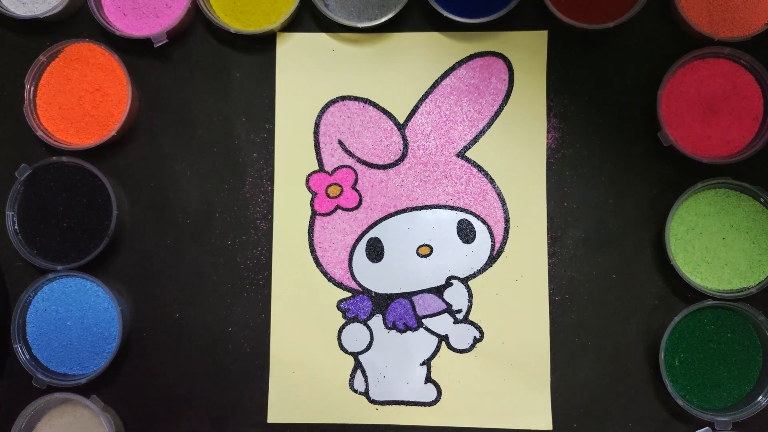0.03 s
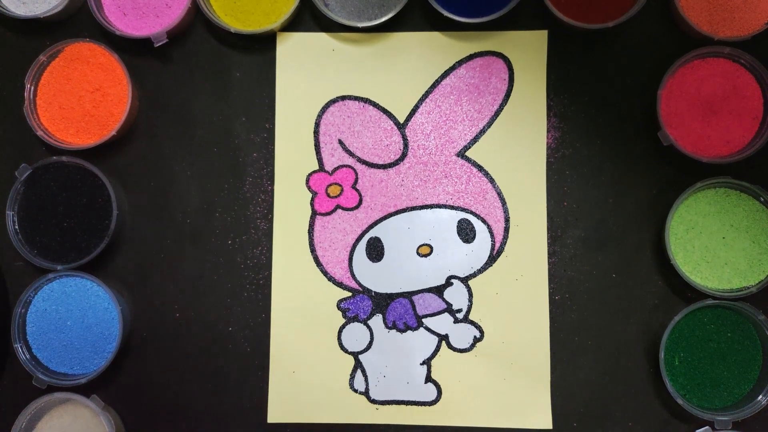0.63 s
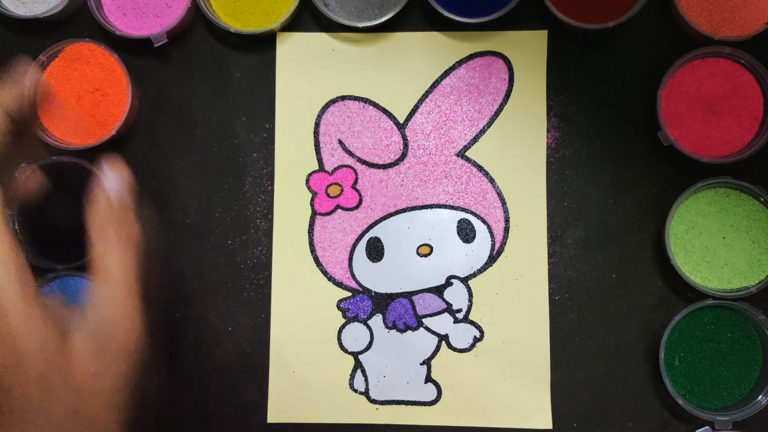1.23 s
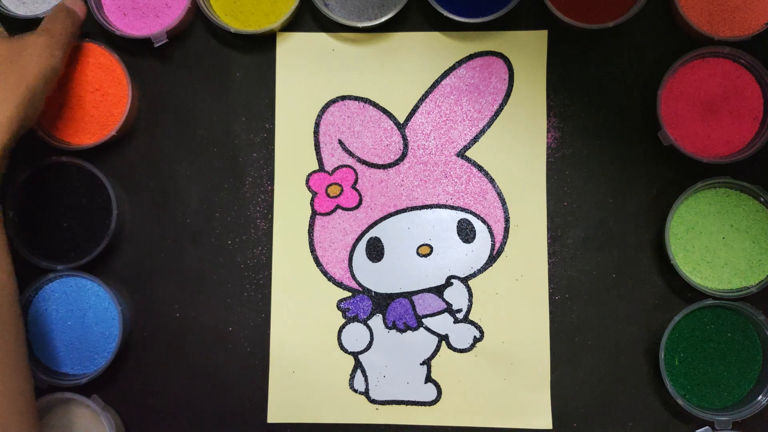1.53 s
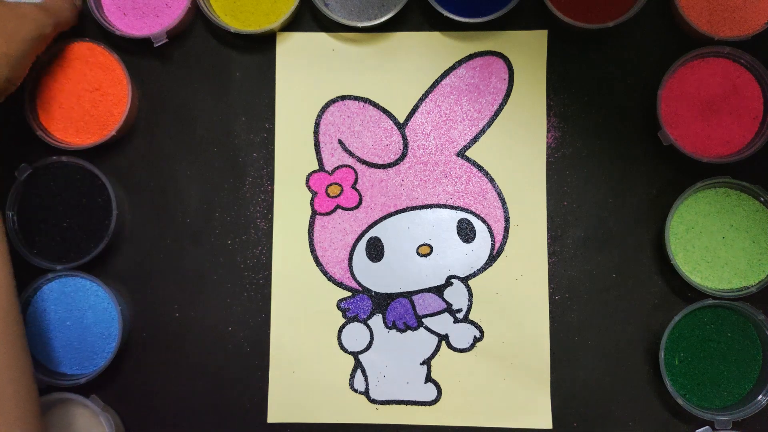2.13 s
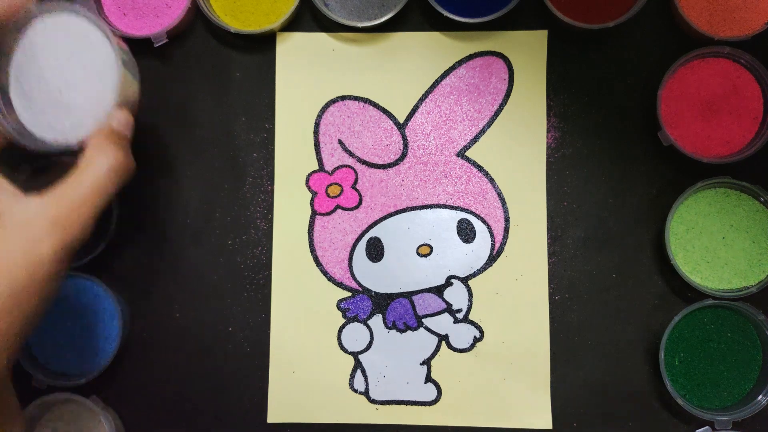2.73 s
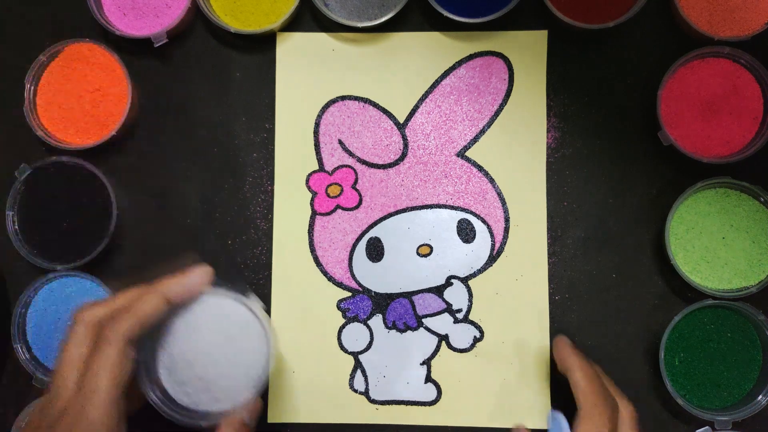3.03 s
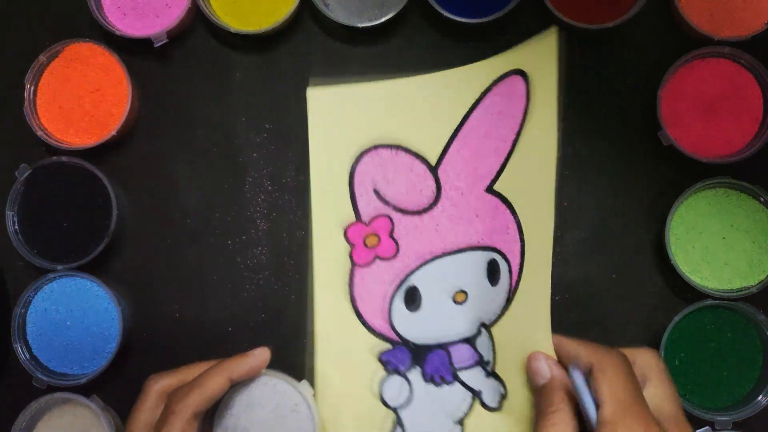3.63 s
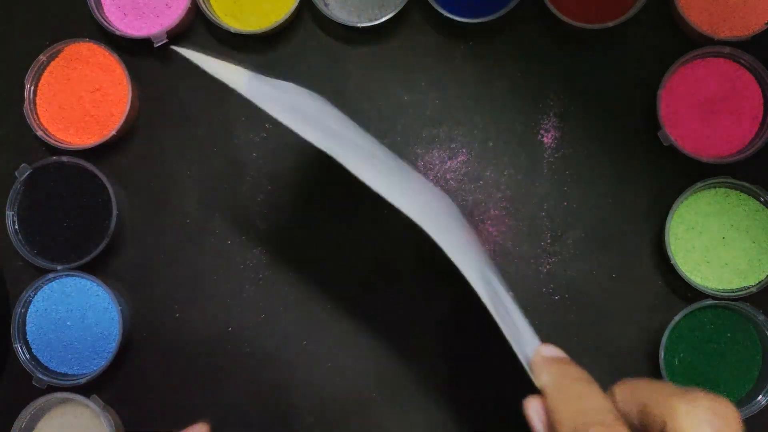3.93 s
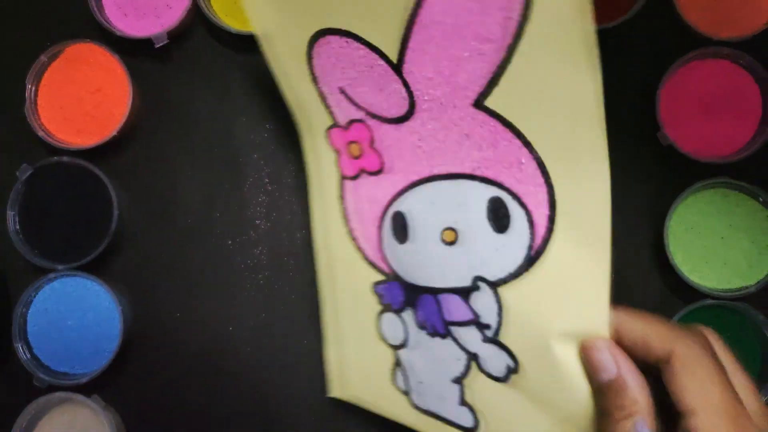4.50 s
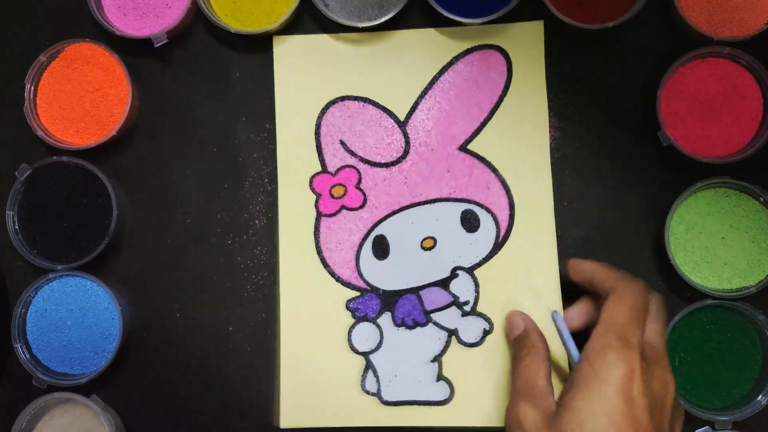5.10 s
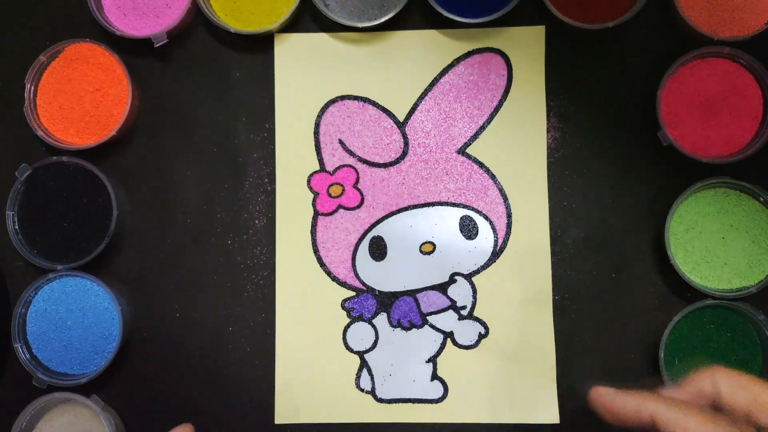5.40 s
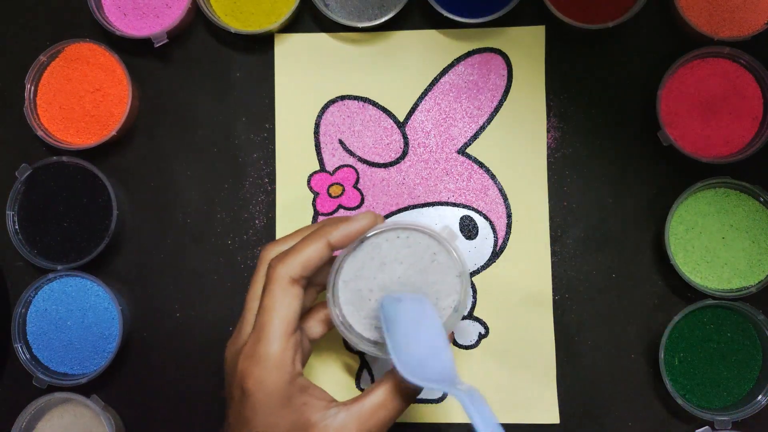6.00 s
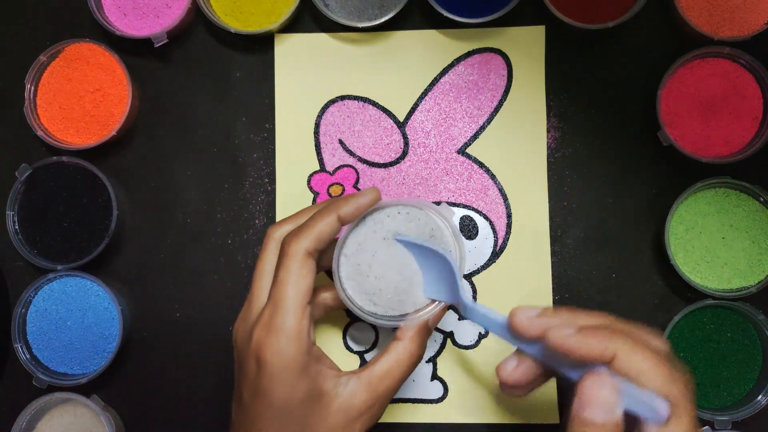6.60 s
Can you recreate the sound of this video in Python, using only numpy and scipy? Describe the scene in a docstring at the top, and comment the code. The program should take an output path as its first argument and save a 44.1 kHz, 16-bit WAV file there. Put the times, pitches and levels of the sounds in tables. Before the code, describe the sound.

A quiet, dry room with a low rumble and faint hiss is heard from close by. A small plastic click and a soft brush of sand come in the first half second, then very little until about 3 seconds. From 3.3 to 3.8 seconds a sand-coated card is dragged off a gritty table in rustling, catching scrapes, with a plastic click and dull buckling pops. It is shaken twice, at about 4.1 and 4.3 seconds, flapping and crinkling while loose grains tick down and a little sand swishes across it. Near 4.8 seconds the card buckles and lands with a short hollow knock and a puff of air, the loudest moment. It slides back into place over crackling grit until 5.3 seconds. After a pause and a tiny click, a plastic spoon digs softly into a pot of sand at around 6.6 seconds.

```python
"""A quiet, dry room with a low rumble, heard from close by. A sand-coated card is dragged off a gritty
table, shaken twice so that it buckles and sheds grains, dropped and slid back into place; then a
plastic spoon digs into a pot of sand. Sliding, scraping and digging are dense tiny grain impacts,
buckles are bending waves, and the face of the card pushes puffs of air. Table and plastic ring briefly."""
import sys
import numpy as np
from scipy import signal
from scipy.fft import rfft, irfft
from scipy.io import wavfile

SR = 44100
rng = np.random.default_rng(int(sys.argv[2]) if len(sys.argv) > 2 else 0)


def to_wav(s):
    """Save 16-bit WAV."""
    ch = np.atleast_2d(s).T  # columns
    pcm = np.round(np.clip(ch, -1, 1) * 32767)  # PCM
    wavfile.write(sys.argv[1], SR, pcm.astype(np.int16))


N = 297675
TIME = np.arange(N) / SR
FREQ = np.maximum(np.arange(N // 2 + 1) * SR / N, .1)
BODY_HZ, HISS_HZ = 1660, 8340  # crossovers: body | rasp | hiss


def undb(db):
    """Decibels to gain."""
    return 10 ** (np.asarray(db) / 20)


def unit_rms(x):
    """Scale to rms 1."""
    return x / np.sqrt(np.mean(x ** 2))


def colour_gain(colour, f):
    """Gain of a (f/Hz, level/dB) curve at f."""
    hz, db = np.transpose(colour)
    return undb(np.interp(np.log(f), np.log(hz), db))


def lowpass(f, hz, order=4):
    """Smooth low-pass gain."""
    return 1 / np.sqrt(1 + (f / hz) ** (2 * order))


def highpass(f, hz, order=4):
    """Smooth high-pass gain."""
    return lowpass(hz, f, order)


def shaped(x, gain):
    """Filter by a gain per frequency; rms 1."""
    return unit_rms(irfft(rfft(x) * gain, N))


def noise(gain):
    """Filtered Gaussian noise; rms 1."""
    return shaped(rng.standard_normal(N), gain)


def wander(rate_hz):
    """Random wander; rms 1."""
    return noise(lowpass(FREQ, rate_hz, order=2))


def minimum_phase(gain):
    """Spectrum of the most compact causal response with these gains."""
    cepstrum = irfft(np.log(gain))
    half = len(cepstrum) // 2
    return np.exp(rfft(np.r_[cepstrum[0], 2 * cepstrum[1:half], np.zeros(half)]))


def add(out, start_s, x):
    """Mix x into out."""
    i = max(int(start_s * SR), 0)
    out[i:i + len(x)] += x[:max(N - i, 0)]


def held(start_s, end_s, attack_s, release_s):
    """Envelope: linear rise, hold, exponential decay."""
    rise = np.clip((TIME - start_s) / attack_s + .5, 0, 1)
    return rise * np.exp(-np.clip((TIME - end_s) / release_s, 0, 20))


def swells(rows):
    """Envelope of Gaussian swells, summed in power."""
    return np.sqrt(sum(undb(2 * db) * np.exp(-((TIME - s) / half_s) ** 2) for s, half_s, db in rows))


def grains(per_s, spread_db):
    """Dense tiny impacts of uneven size."""
    size = undb(spread_db * np.minimum(rng.exponential(size=N), 4))
    return (rng.random(N) < per_s / SR) * size * rng.standard_normal(N)


# room noise spectrum: f/Hz, level/dB
ROOM_COLOUR = [(12, -44), (20, -2), (30, -9.5), (38, -12.5), (74, -16.5), (248, -27), (277, -27),
               (738, -32.5), (923, -34.5), (1370, -36.5), (2990, -40), (12800, -45), (16000, -46.5)]

def room_tone(hiss_db=-50.5, drift_db=-43):
    """Steady hiss and rumble over slow pressure drift."""
    hiss = noise(colour_gain(ROOM_COLOUR, FREQ) * highpass(FREQ, 15.5))
    drift = noise(lowpass(FREQ, 12, order=2) * highpass(FREQ, 2.06))
    return undb(hiss_db) * hiss + undb(drift_db) * drift


def reflections(x, t60_s=0.081, gap_s=.004, wet_db=-25):
    """The faint, short answer of the room."""
    t = np.arange(SR // 3) / SR
    response = rng.standard_normal(len(t)) * undb(-60 * t / t60_s) * (t > gap_s)
    return undb(wet_db) * signal.fftconvolve(x, response / np.linalg.norm(response))[:N]


# strokes through sand: centre t/s, half-length/s, level/dB
SAND_STROKES = [(0.355, 0.011, -51.5), (0.407, 0.035, -57.5), (1.707, .05, -61), (2.923, .05, -60),
                (3.182, 0.017, -54), (6.552, 0.024, -51), (6.629, 0.036, -44), (6.688, 0.037, -46.5)]
# spooned sand spectrum: f/Hz, level/dB
SAND_COLOUR = [(150, -11), (290, 7.5), (450, -20), (900, -2.5), (1700, 0), (2500, -2.5), (3200, 1),
               (4000, -2), (5700, 1.5), (7000, -6), (9000, -10), (12000, -7.5), (15500, -16)]

def sand_strokes():
    """Fine sand parts with a smooth hiss around the spoon or under a hand."""
    return swells(SAND_STROKES) * shaped(grains(per_s=14000, spread_db=1.0), colour_gain(SAND_COLOUR, FREQ))


# clicks of spoon and pots: t/s, relative level/dB
PLASTIC_CLICKS = [(.1566, -35.5), (3.4878, -21.5), (6.202, -48.5)]
# plastic modes: f/Hz, width/Hz, relative level/dB
PLASTIC_MODES = [(1600, 290, -12), (5550, 870, 6.5), (11400, 2000, -8.5)]

def plastic_clicks(gain_db=25.5):
    """Plastic snaps with a thin, heavily damped ring."""
    out, t = np.zeros(N), np.arange(SR // 100) / SR
    ring = sum(undb(db) * width_hz * np.exp(-np.pi * width_hz * t) * np.cos(2 * np.pi * hz * t)
               for hz, width_hz, db in PLASTIC_MODES)
    ring[0] /= 2  # attack falls mid-sample
    for s, db in PLASTIC_CLICKS:
        add(out, s, undb(db + gain_db) * ring / np.linalg.norm(ring))
    return out


# a pot or the flat of the card lands: t/s, peak level/dB
LANDINGS = [(3.1615, -33.5), (4.774, -10.5), (4.945, -28.5)]
# table top modes: f/Hz, t60/s, relative level/dB
TABLE_MODES = [(660, 0.039, -3.5), (990, 0.019, 4), (1980, 0.019, -4)]

def table_knocks():
    """The struck table answers with a short hollow knock."""
    out, t = np.zeros(N), np.arange(SR // 10) / SR
    ring = sum(undb(db - 60 * t / t60_s) * np.sin(2 * np.pi * hz * t) for hz, t60_s, db in TABLE_MODES)
    for s, db in LANDINGS:
        add(out, s, undb(db) * ring / np.abs(ring).max())
    return out


# sand slips: centre t/s, half-length/s, level/dB
SAND_SLIPS = [(4.592, 0.019, -46.5), (4.671, 0.01, -45.5)]
# slipping sand spectrum: f/Hz, level/dB
SLIP_COLOUR = [(500, -2), (1600, -11), (3200, 0), (6500, -3.5), (9000, -13), (15500, -19)]

def sand_slips():
    """A thin sheet of sand swishes across the tilted card."""
    return swells(SAND_SLIPS) * shaped(grains(per_s=14000, spread_db=3.5), colour_gain(SLIP_COLOUR, FREQ))


# card pushed into place: centre t/s, half-length/s, level/dB
EDGE_RUBS = [(5.098, 0.017, -42), (5.191, 0.0032, -37)]

def edge_rubs(first_hz=2930, rise_hz_per_s=4100, width_hz=330):
    """A narrow resonance of the rubbing edge, rising as the fingers press."""
    hz = first_hz + rise_hz_per_s * (TIME - EDGE_RUBS[0][0])
    phase = 2 * np.pi * np.cumsum(hz) / SR
    return swells(EDGE_RUBS) * (wander(width_hz) * np.cos(phase) + wander(width_hz) * np.sin(phase))


# spills: start t/s, end t/s, relative level/dB, brightness/dB
GRAIN_SPILLS = [(3.927, 4.122, -52, 2), (4.191, 4.499, -47.5, 1), (4.778, 5.062, -39.5, -5)]

def spilled_grains(count=15, spread_db=3.5):
    """Tick rows: grains fall off the lifted card, then crack under it as it settles."""
    rows = []
    for start_s, end_s, db, bright_db in GRAIN_SPILLS:
        times = start_s + (end_s - start_s) * (np.arange(count) + rng.random(count)) / count
        rows += [(s, db + spread_db * rng.uniform(-1, 1), bright_db) for s in times]
    return rows


# loudest single grains: t/s, relative level/dB, brightness/dB
GRAIN_TICKS = [(.3361, -41.5, -5), (3.161, -45.5, -4), (3.342, -31.5, 0), (3.676, -23, 17),
               (3.7673, -22.5, 3), (3.7734, -21, -3), (3.8091, -19.5, -1.5), (3.8264, -34.5, -4),
               (4.0112, -40, 1), (4.0325, -45.5, 6), (4.101, -44, -1), (4.1262, -27, -11),
               (4.152, -30.5, -7), (4.1656, -28, 0), (4.3122, -22, -20), (4.3763, -30, -1),
               (4.7244, -33, -20), (4.737, -29.5, 2), (4.8993, -27.5, -7), (4.9262, -33, -11),
               (4.956, -32.5, -12), (4.9945, -35.5, -16), (5.0186, -31.5, -4), (5.0791, -33.5, 2),
               (5.1725, -30, 3.5)]
# single grain spectrum: f/Hz, level/dB
GRAIN_COLOUR = [(200, -11), (800, -8), (1600, 2), (2500, 1), (4800, 3), (6400, 2), (8500, -6), (12000, 1),
                (15500, 1.5)]

def grain_ticks(shatter_s=0.00078, rattle_s=0.0037, gain_db=22.0, size=2048):
    """A grain cracks or lands within a millisecond and leaves a faint rattle."""
    out, t = np.zeros(N), np.arange(size) / SR
    f = np.maximum(np.arange(size // 2 + 1), 1) * SR / size
    decay = 0.41 * np.exp(-t / shatter_s) + 0.027 * np.exp(-t / rattle_s)
    for s, db, bright_db in [*GRAIN_TICKS, *spilled_grains()]:
        crack = (t == 0) + rng.standard_normal(size) * decay
        shelf = undb(bright_db * highpass(f, HISS_HZ) ** 2)
        wave = irfft(rfft(crack) * minimum_phase(colour_gain(GRAIN_COLOUR, f) * shelf))
        add(out, s, undb(db + gain_db) * wave / np.linalg.norm(wave))
    return out


# pressure bumps: centre t/s, half-length/s, level before the leak/dB
AIR_PUFFS = [(3.5112, 0.0011, -12), (3.541, 0.0037, -20), (3.809, 0.0003, -8), (3.8137, 0.0028, -14),
             (4.127, 0.0011, -15), (4.204, 0.0021, -24.5), (4.7764, 0.0024, -3), (4.781, 0.0087, -20),
             (4.853, 0.005, -16.5), (5.282, 0.0091, -11.5)]

def air_puffs(sway, leak_hz=35):
    """The card's face pushes air: a pressure bump that swings back, over a soft flutter."""
    push = sum(undb(db) * np.exp(-((TIME - s) / half_s) ** 2) for s, half_s, db in AIR_PUFFS)
    flutter = undb(-6.0) * sway * noise(lowpass(FREQ, 76, order=2) * highpass(FREQ, 5.0))
    return flutter - signal.sosfilt(signal.butter(2, leak_hz, "high", fs=SR, output="sos"), push)


def warped(x, depth_db, hold_s=0.0083, width_hz=260, size=512):
    """The card's resonances wander as it bends: each holds briefly, then gives way."""
    framing = dict(fs=SR, nperseg=size, noverlap=size - size // 4)
    f, t, frames = signal.stft(x, **framing)
    over_f = np.exp(-((f[:25] - f[12]) / width_hz) ** 2)
    over_t = np.exp(-((t[:25] - t[12]) / hold_s) ** 2)
    resonance = signal.fftconvolve(rng.standard_normal(frames.shape), np.outer(over_f, over_t), "same")
    return signal.istft(frames * undb(depth_db * unit_rms(resonance)), **framing)[1][:N]


def friction(contact, colour, envelopes):
    """Grain contacts heard through the card's body, as mid rasp and as fine hiss."""
    gain = colour_gain(colour, FREQ)
    body, hiss = lowpass(FREQ, BODY_HZ), highpass(FREQ, HISS_HZ, order=8)
    rasp = np.sqrt((1 - body ** 2) * (1 - hiss ** 2))
    return sum(level * shaped(contact, gain * band) for level, band in zip(envelopes, (body, rasp, hiss)))


# pushes over sand: start t/s, end t/s, relative body/dB, rasp/dB, hiss/dB
CARD_PUSHES = [(3.301, 3.388, -37.5, -47.5, -54), (3.378, 3.532, -34, -36, -36),
               (3.54, 3.671, -43.5, -36.5, -40.5), (3.673, 3.802, -36.5, -35.5, -37.5),
               (4.78, 4.867, -39.5, -37, -43), (4.864, 5.001, -43.5, -49, -48.5),
               (5.005, 5.084, -43.5, -47, -42.5), (5.089, 5.133, -45, -39, -37.5),
               (5.135, 5.231, -51.5, -48, -49), (5.278, 5.286, -39.5, -47, -50)]
# flicks: t/s, flapping time/s, relative level/dB
CARD_FLAPS = [(4.124, 0.038, -31.5), (4.313, 0.092, -35), (4.738, 0.019, -30.5)]
# body, rasp and hiss of a flap: offset/dB, fade/(dB/s)
FLAP_BANDS = [(1, 47), (-8, 87), (-13, 50)]

def card_motion():
    """Body, rasp and hiss envelopes as the card is pushed, or flicked and left to flap."""
    power = np.zeros((3, N))
    for start_s, end_s, *band_db in CARD_PUSHES:
        push = held(start_s, end_s, attack_s=0.02, release_s=0.014)
        power += np.outer(undb(band_db), push) ** 2
    for s, length_s, db in CARD_FLAPS:
        flap = held(s, s + length_s, attack_s=0.0011, release_s=0.041)
        age_s = np.clip(TIME - s, 0, length_s)
        power += np.array([flap * undb(db + offset - fade * age_s) for offset, fade in FLAP_BANDS]) ** 2
    return np.sqrt(power)


# sliding grit spectrum: f/Hz, level/dB
GRIT_COLOUR = [(100, 6), (200, 4), (400, 2), (1000, -6.5), (1900, -18), (3500, -14.5), (5900, -15.5),
               (8300, -25), (12500, -13), (15500, -15)]

def card_slides(envelopes):
    """The card glides over loose sand with a slightly uneven grip."""
    contact = warped(grains(per_s=14000, spread_db=2.0), depth_db=2.0)
    grip = undb(2.03 * wander(rate_hz=110))
    return undb(-1.43) * friction(contact * grip, GRIT_COLOUR, envelopes)


# catches on the grit: t/s, length/s, relative level/dB, body-to-hiss tilt/dB
CARD_CATCHES = [(3.335, 0.03, -37, 2), (3.392, 0.011, -29.5, -4), (3.412, 0.007, -27.5, -4.5),
                (3.428, 0.013, -27, 0), (3.463, 0.018, -33, 0), (3.484, 0.022, -31, -4),
                (3.544, 0.032, -40, 9.5), (3.671, 0.031, -29, 5), (3.713, 0.013, -28, -1),
                (3.741, 0.0066, -30.5, 4.5), (3.765, 0.013, -26, -1.5), (3.786, 0.0082, -30, 3),
                (4.145, 0.0087, -34, -3.5), (4.17, 0.0084, -34.5, -5), (4.311, 0.027, -34.5, -5),
                (4.371, 0.0053, -38, 3), (4.772, 0.005, -23.5, -3), (4.783, 0.012, -31, 1),
                (4.842, 0.012, -30, 3.5), (4.94, 0.015, -41.5, 1)]
# scraped card spectrum: f/Hz, level/dB
CARD_COLOUR = [(100, -6), (200, -26), (330, 2), (520, 0.5), (780, -6.5), (1200, -1.5), (2000, -10.5),
               (3100, -10), (5100, -5), (8100, -17.5), (12400, -12), (15500, -15.5)]

def card_scrapes(rise_s=0.0029, fall_s=0.00079, body_db=0.5, hiss_db=-5.5):
    """Each catch is a short burst of stick-slip on coarse grains."""
    envelopes, t = np.zeros((3, N)), np.arange(SR // 10) / SR
    for s, length_s, db, tilt_db in CARD_CATCHES:
        burst = np.minimum(t / rise_s, 1) * np.exp(-np.maximum(t - length_s, 0) / fall_s)
        for envelope, offset_db in zip(envelopes, (body_db - tilt_db, 0, hiss_db + tilt_db)):
            add(envelope, s - rise_s / 2, undb(db + offset_db) * burst)
    contact = warped(grains(per_s=10000, spread_db=1.5), depth_db=2.5)
    grip = undb(2.6 * wander(rate_hz=210))
    return undb(-1.5) * friction(contact * grip, CARD_COLOUR, envelopes)


# buckles and edge knocks: t/s, relative level/dB, stiffness as cut-off f/Hz
CARD_BUCKLES = [(3.162, -25.5, 855), (3.292, -28.5, 1700), (3.398, -18, 1500), (3.438, -14, 1700),
                (3.564, -19, 1490), (3.717, -22, 1600), (3.808, -19.5, 2970), (4.128, -16.5, 2550),
                (4.191, -22, 1600), (4.254, -31.5, 990), (4.3124, -14, 2980), (4.385, -21, 1100),
                (4.406, -23.5, 1280), (4.44, -24, 1400), (4.739, -11, 2440), (4.752, -26, 1200),
                (4.7742, -9, 940), (4.945, -19, 1600), (5.175, -23.5, 2600), (5.292, -27.5, 1610)]
# buckle spectrum: f/Hz, level/dB
BUCKLE_COLOUR = [(60, 0), (150, 2.5), (420, 0.5), (720, -0.5), (1030, -1.5), (1500, -6), (2800, -1.5),
                 (6000, -23), (16000, -43)]

def card_buckles(ring_s=0.0037, delay_1khz_s=0.00199, gain_db=-4.0, size=4096):
    """A buckle sends a bending wave through the card; its highs arrive first and it dies fast."""
    out, t = np.zeros(N), np.arange(size) / SR
    f = np.maximum(np.arange(size // 2 + 1), 1) * SR / size
    dispersion = np.exp(-4j * np.pi * delay_1khz_s * np.sqrt(1000 * f))  # delay ~ 1 / sqrt(f)
    for s, db, cutoff_hz in CARD_BUCKLES:
        push = (t == 0) + 0.069 * rng.standard_normal(size) * np.exp(-t / ring_s)
        response = minimum_phase(colour_gain(BUCKLE_COLOUR, f) * lowpass(f, cutoff_hz, order=3))
        wave = irfft(rfft(push) * response * dispersion)
        add(out, s - 0.687 * delay_1khz_s, undb(db + gain_db) * wave / np.abs(wave).max())
    return out


def scene():
    """Card, sand and spoon in the room; mono."""
    envelopes = card_motion()
    near = card_slides(envelopes) + card_scrapes() + sand_slips() + edge_rubs() + card_buckles()
    near += table_knocks() + grain_ticks() + plastic_clicks() + sand_strokes()
    return (near + reflections(near) + air_puffs(sway=envelopes[0]) + room_tone())[None]


def record(dry):
    """Clip at full scale, then cut the top."""
    top_hz = 15850
    return signal.sosfilt(signal.ellip(10, .1, 80, top_hz, fs=SR, output="sos"), np.clip(dry, -1, 1))


dry = scene()
out = record(dry)
to_wav(out)
```